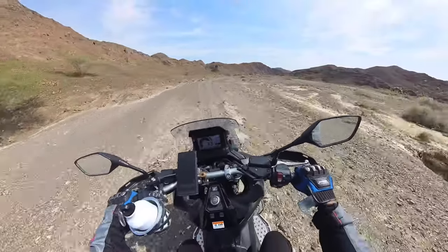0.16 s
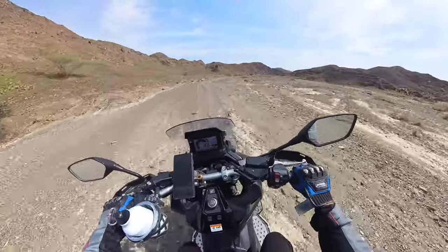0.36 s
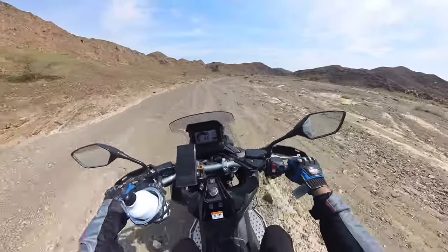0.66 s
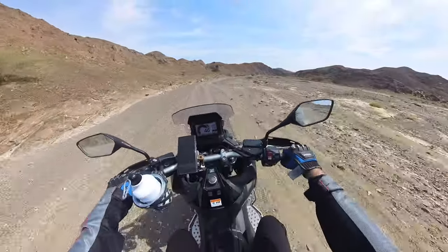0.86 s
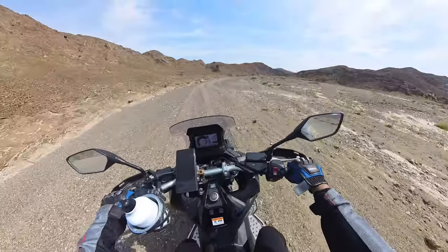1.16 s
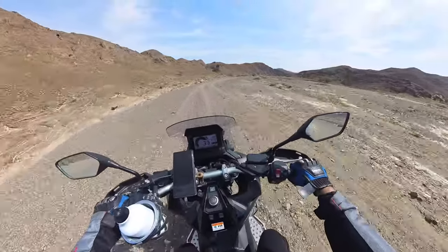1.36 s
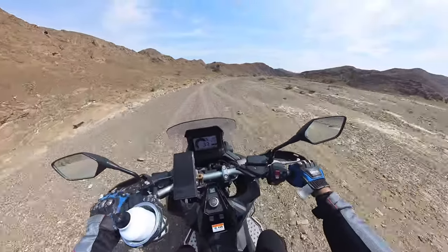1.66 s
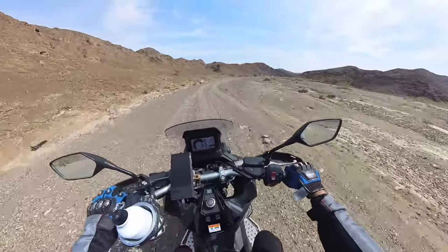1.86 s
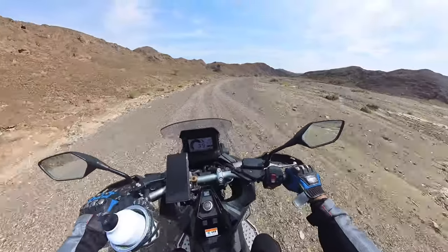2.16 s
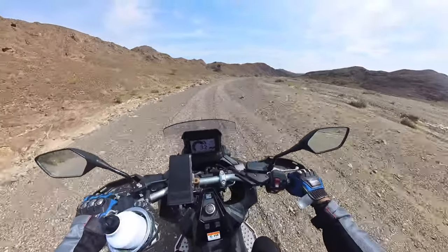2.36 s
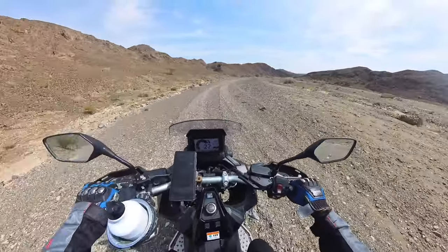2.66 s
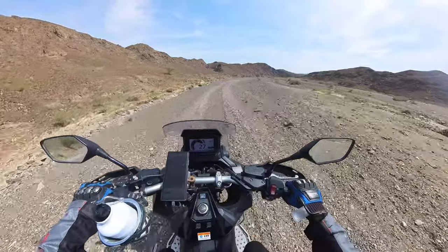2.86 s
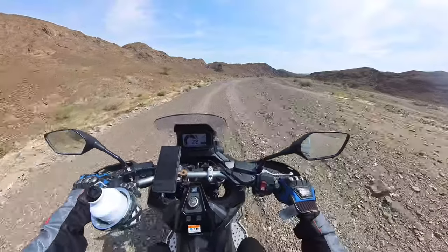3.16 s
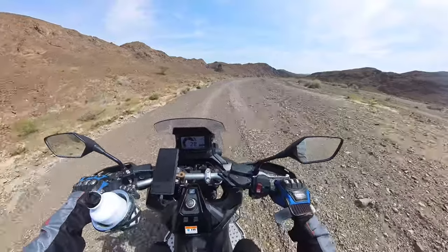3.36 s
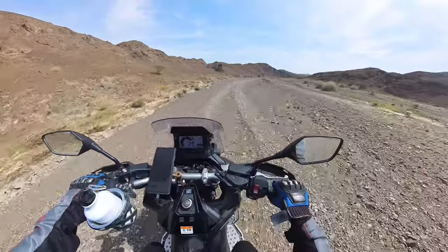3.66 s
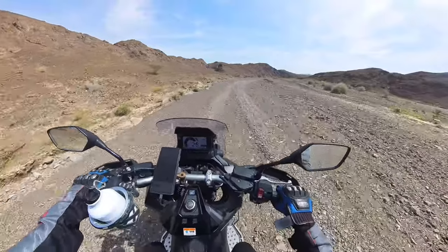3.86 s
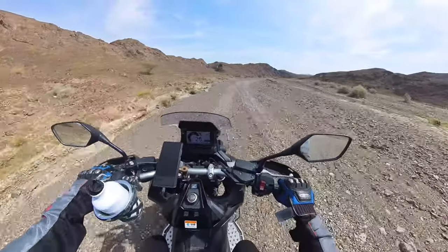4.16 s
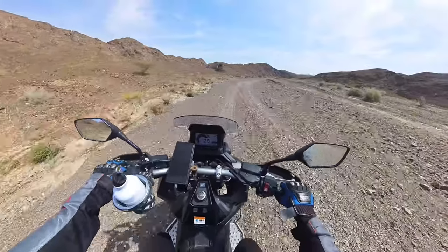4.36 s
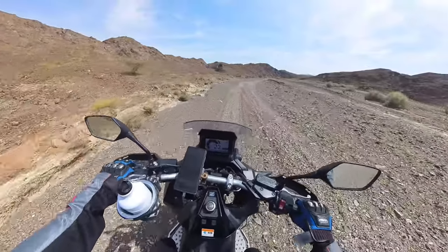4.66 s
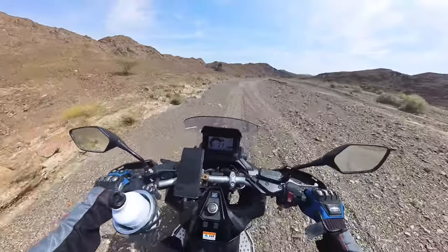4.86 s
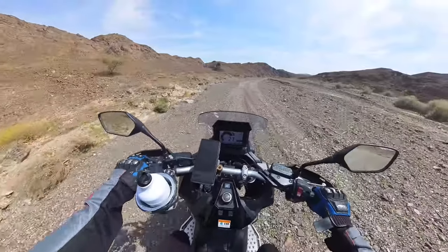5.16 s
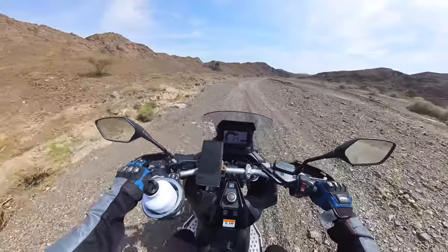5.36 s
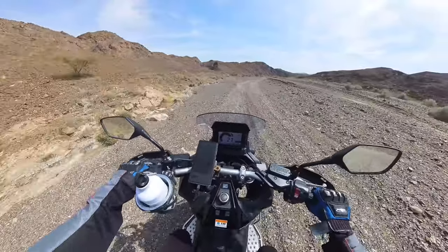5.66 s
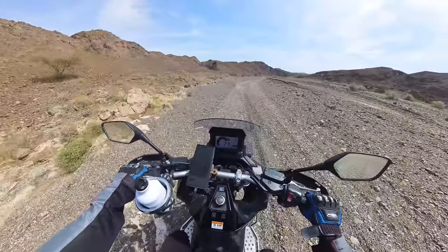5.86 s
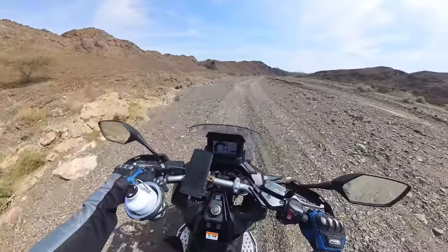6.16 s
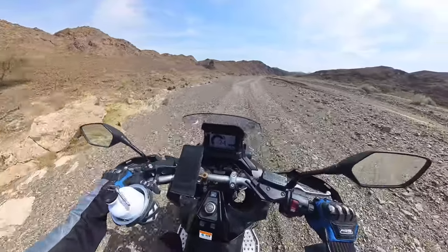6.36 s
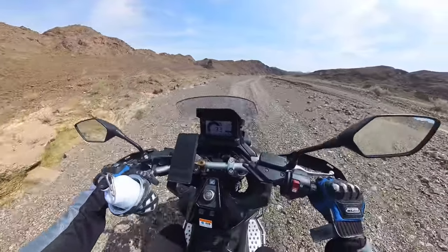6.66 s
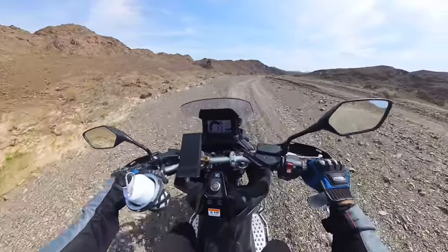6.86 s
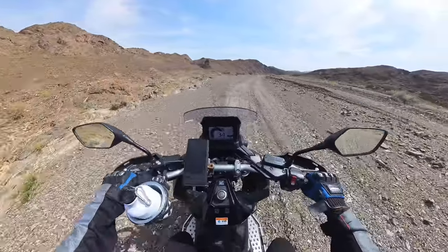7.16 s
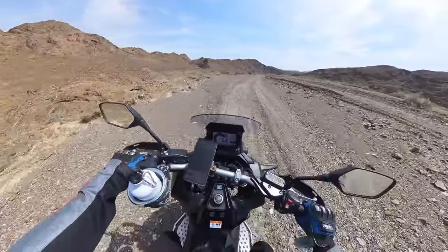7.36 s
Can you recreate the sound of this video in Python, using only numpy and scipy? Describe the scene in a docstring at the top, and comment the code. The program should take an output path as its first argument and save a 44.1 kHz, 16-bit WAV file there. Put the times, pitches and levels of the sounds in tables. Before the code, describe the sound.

A twin-cylinder motorcycle runs along a gravel track, heard close from the rider's chest, with crunching tyres, ticking pebbles and a low wind rumble throughout. A few stones knock on the chassis in the first half second. At about 0.5 seconds the engine flares in a loud, booming rev as the rumble swells, then the throttle snaps shut at 0.9 seconds with a brief ringing note from the pipes. The revs sink gradually, growing quieter and reaching an uneven, near-idle chug by 4.7 seconds. Faint pebble clicks come between 3.8 and 5 seconds. From 5.8 seconds the engine pulls again, rising in pitch with hard, thumping, hissing beats and louder gravel, strongest from 6.5 to 7.1 seconds and slightly overloading the microphone. The throttle then closes, the revs fall, and a stone knocks sharply on the chassis at about 7.3 seconds, followed by a softer knock.

```python
"""A twin-cylinder motorcycle on a gravel track, heard from the rider's chest.
The engine flares, eases down almost to idle and pulls again. Each cylinder gulps air: the gulp
thumps, booms in the airbox, barks in the pipes and hisses. Tyres crunch, pebbles tick and stones
knock on the chassis over a rumble of wind and frame. The loudest beats overload the microphone."""
import sys
import numpy as np
from scipy import signal
from scipy.fft import rfft, irfft, next_fast_len
from scipy.io import wavfile
from scipy.ndimage import uniform_filter1d

SR = 44100
rng = np.random.default_rng(int(sys.argv[2]) if len(sys.argv) > 2 else 0)


def file_out(sig):
    """Save sig as 16-bit WAV at sys.argv[1]."""
    # one column per channel
    cols = np.atleast_2d(sig).T
    # limit, then scale
    lim = np.clip(cols, -1, 1)
    pcm = np.round(lim * 32767).astype(np.int16)
    wavfile.write(sys.argv[1], SR, pcm)


N = 331191
T = np.arange(N) / SR

START_TURN, SECOND_CYLINDER = -.44, 3 / 8  # cycles: starting crank angle, lag of the second cylinder
CRACKED = 0.074  # throttle opening at which the cylinders begin to draw freely
PULLING = (0.22, 0.44)  # openings between which the engine turns from trailing to pulling

# The rise and fall of the airbox boom. Each row: time in seconds, level in dB.
BOOM_LEVEL = [(0, -26), (.38, -28.5), (.47, -20), (.9, -21), (1.1, -32), (1.9, -28), (2.38, -27.5),
              (2.7, -39), (3.1, -35.5), (4.05, -44), (4.3, -35), (4.7, -41), (5.2, -30), (5.5, -34.5),
              (5.8, -25.5), (6.45, -15.5), (7.1, -19), (7.51, -23)]
# The midrange colour of tyre crunch and engine chuff. Each row: frequency in Hz, relative level in dB.
MIDRANGE_SPECTRUM = [(150, 5.5), (300, 9.5), (420, 14), (560, 9), (740, 6.5), (900, 4), (1350, 2),
                     (1550, -4.5), (1950, -14), (2400, -18.5), (2900, -30), (4500, -62.5), (9500, -32.5),
                     (12000, -65)]
# The bright colour of loose pebbles. Each row: frequency in Hz, relative level in dB.
PEBBLE_SPECTRUM = [(800, -5.5), (2000, 7), (3400, -0.5), (4500, -6.5), (6000, -5), (9500, -2.5),
                   (12000, -16.5), (15500, -18)]


def amp(db):
    """Decibels as a gain."""
    return 10 ** (np.asarray(db) / 20)


def bell(x, width):
    """A smooth bump of height 1 around zero."""
    return np.exp(-.5 * (x / width) ** 2)


def swell(at_s, width_s, db):
    """A gain that rises by db around one moment."""
    return amp(db * bell(T - at_s, width_s))


def curve(rows):
    """An envelope of straight lines through (seconds, value) points."""
    return np.interp(T, *np.transpose(rows))


def evened(x):
    """Unit power over the whole sound."""
    return x / np.sqrt(np.mean(x ** 2) + 1e-20)


def steadied(x, size=7000):
    """Unit power over a sliding window of samples; single beats keep their accents."""
    return x / np.sqrt(abs(uniform_filter1d(uniform_filter1d(x ** 2, size), size)) + 1e-12)


def coloured(x, spectrum):
    """Equalises x with a curve of (Hz, dB) points."""
    hz, db = np.transpose(spectrum)
    size = next_fast_len(N + 4096)
    gain = amp(np.interp(np.log(np.fft.rfftfreq(size, 1 / SR) + 1), np.log(hz), db))
    return irfft(rfft(x, size) * gain, size)[:N]


def noise(spectrum):
    """Coloured noise of unit power."""
    return evened(coloured(rng.standard_normal(N), spectrum))


def resonate(x, modes):
    """Rings parallel resonances, each given as (Hz, width in Hz, dB)."""
    return sum(amp(db) * signal.lfilter(*signal.iirpeak(hz, hz / width, SR), x)
               for hz, width, db in modes)


def controls():
    """The drive: engine speed, and the throttle opening with the jolts of the rider's wrist."""
    # The revs. Each row: time in seconds, four-stroke cycles per second.
    revs = [(0, 23.65), (.39, 23.49), (.43, 26.07), (.73, 28.65), (.81, 33.74), (1.05, 25.26),
            (1.93, 22.55), (2.34, 20.07), (2.45, 20.4), (2.71, 16.32), (2.85, 17.99), (3.36, 16.93),
            (3.53, 15.76), (4.39, 15.8), (4.72, 12.77), (5.74, 12.51), (5.8, 14.36), (6.03, 14.73),
            (6.42, 17.8), (6.46, 19.25), (7.11, 22.81), (7.51, 16.6)]
    # The twist grip: a burst, a long trail, idle, a pull. Each row: time in seconds, opening 0-1.
    grip = [(0, .01), (.45, 0), (.58, 0.79), (.86, 0.89), (.92, .03), (1.12, .05), (1.23, 0.06),
            (2.3, 0.21), (3.35, 0.1), (3.9, 0.02), (5.69, 0), (5.79, 0.31), (6.3, 0.53), (6.48, 0.87),
            (7.05, 0.99), (7.27, 0.03), (7.51, 0.1)]
    # Bumps jolt the wrist. Each row: centre in seconds, half length in seconds, change of opening.
    bumps = [(2.438, 0.071, -.14), (2.737, 0.057, 0.15), (2.836, 0.047, -.22), (3.238, 0.025, -.14),
             (3.524, 0.083, 0), (3.799, 0.0083, 0.23), (6.459, .035, .15), (6.6, .05, -.18),
             (7.17, .05, -.12)]
    jolts = sum(change * bell(T - at, half) for at, half, change in bumps)
    return curve(revs), np.clip(curve(grip) + jolts, 0, 1)


def loudness(speed, throttle, db, octave, cracked, full):
    """Gain: db at 20 cycles/s, plus dB per octave of speed, once cracked open and at full throttle."""
    return amp(db + octave * np.log2(speed / 20) + cracked * np.tanh(throttle / CRACKED)
               + full * throttle)


def pull(throttle):
    """How firmly the engine pulls, from 0 (trailing) to 1."""
    return np.interp(throttle, PULLING, (0, 1))


def unevenness(speed, throttle):
    """A slow engine on a shut throttle fires unevenly; speed or throttle firms it up."""
    idle_speed, firm_opening = 11.6, 0.33
    return 0.083 + 0.44 * np.exp(-(speed - idle_speed) / 4.5 - (throttle / firm_opening) ** 2)


def crank_turns(speed):
    """The running crank angle, in four-stroke cycles."""
    return START_TURN + np.cumsum(speed) / SR


def strokes(speed, throttle):
    """For each cylinder: crank angle from its nearest gulp in cycles, its strength, a random accent."""
    turns, rough = crank_turns(speed), unevenness(speed, throttle)
    cylinders = []
    for offset in (0, SECOND_CYLINDER):
        nearest = np.round(turns - offset)
        late, strong, accent = rng.standard_normal((256, 3))[nearest.astype(int) + 2].T
        angle = turns - offset - nearest - 0.046 * rough * late
        cylinders.append((angle, amp(6.4 * rough * strong), accent))
    return cylinders


def gulps(cylinders, width, lag, second_db):
    """Pressure rises, then drops sharply as the valve opens; width and lag are in cycles."""
    return sum(-amp(db) * strength * (angle - lag) / width * bell(angle - lag, width)
               for (angle, strength, _), db in zip(cylinders, (0, second_db)))


def beats(cylinders, throttle, scatter_db=1.8, second_db=-1):
    """Crank angle and scattered gain of each cylinder's beats; the second is softer under load."""
    return [(angle, amp(scatter_db * accent + db * throttle))
            for (angle, _, accent), db in zip(cylinders, (0, second_db))]


def intake_thump(cylinders, speed, throttle):
    """Broad gulps of air thump; under load they are shorter."""
    pulling = pull(throttle)
    pressure = gulps(cylinders, width=.06 - 0.016 * pulling, lag=0.0017 + 0.0085 * pulling, second_db=.1)
    return steadied(pressure) * loudness(speed, throttle, db=-30, octave=9, cracked=9, full=-8)


def airbox_boom(cylinders, throttle):
    """The steep edge of each gulp rings the airbox."""
    # The airbox's one low resonance: frequency in Hz, width in Hz, relative level in dB.
    airbox = [(110.5, 26.4, 0)]
    pressure = gulps(cylinders, width=0.038, lag=0.0078 + 0.011 * pull(throttle), second_db=-1)
    return steadied(resonate(pressure, airbox)) * amp(curve(BOOM_LEVEL))


def pipe_bark(cylinders, speed, throttle):
    """Sharp gulps and pulsing turbulence ring the pipes, raspier when the firing is uneven."""
    # The pipes' resonances. Each row: frequency in Hz, width in Hz, relative level in dB.
    pipes = [(185, 16, -11.5), (250, 30, 6), (274.6, 56, 11), (317.7, 44, 6), (400, 33, -18)]
    clean = steadied(resonate(gulps(cylinders, width=0.0057, lag=0.017, second_db=-2), pipes))
    gate = sum(bell(angle - .05, 0.15) for angle, _, _ in cylinders)
    turbulent = steadied(resonate((0.29 + gate) * rng.standard_normal(N), pipes))
    bark = steadied(clean + (0.35 + 0.96 * unevenness(speed, throttle)) * turbulent)
    follow = amp(.45 * (curve(BOOM_LEVEL) + 26.5))  # a share of the boom's swing about its middle level
    return bark * follow * loudness(speed, throttle, db=-48, octave=7, cracked=2, full=1)


def engine_note(speed, throttle):
    """Clean upper harmonics, locked to the crank; their mix changes with the load."""
    # Each row: multiple of the cycle rate, then relative dB with the throttle shut, trailing, pulling.
    harmonics = [(7, -45, -39, -48), (8, -38, -38, -31), (9, -54, -45, -37), (10, -51, -47, -41),
                 (11, -47, -42, -35), (12, -49, -42, -41), (13, -53, -44, -41), (14, -42, -50, -39),
                 (15, -58, -44, -47), (16, -58, -42, -42), (17, -60, -52, -43), (18, -58, -48, -54),
                 (19, -54, -55, -48), (21, -61, -58, -55)]
    turns = crank_turns(speed) - .2  # 0.2 cycles after each gulp, so the pulses fall between the gulps
    drawing, pulling = np.tanh((throttle / CRACKED) ** 2), pull(throttle)
    brisk = np.interp(speed, (18, 21.5), (.1, 1))  # without load the note fades near idle
    shares = np.array([brisk * (1 - drawing), brisk * drawing * (1 - pulling), pulling])
    tone = np.zeros(N)
    for order, *db in harmonics:
        pair_phase = np.angle(1 + np.exp(-2j * np.pi * order * SECOND_CYLINDER))
        tone += amp(db) @ shares * np.cos(2 * np.pi * order * turns + pair_phase)
    return np.sqrt(2) * tone * loudness(speed, throttle, db=1.5, octave=2.5, cracked=-3, full=0.5)


def pipe_singing(speed, throttle):
    """Turbulence excites one sharp pipe resonance, which sings out as the first burst snaps shut."""
    # The resonance, rung twice over to narrow it: frequency in Hz, width in Hz, relative level in dB.
    mode = [(327, 12, 0)]
    tone = steadied(resonate(resonate(rng.standard_normal(N), mode), mode), size=3000)
    gain = loudness(speed, throttle, db=-50, octave=11, cracked=-12.5, full=10.5)
    return tone * gain * swell(at_s=0.89, width_s=0.06, db=23)


def intake_hiss(cylinders, speed, throttle):
    """Each gulp hisses; under load the hiss tightens to a snap with a weaker one close behind."""
    # The colours of the soft hiss and the hard snap. Each row: frequency in Hz, relative level in dB.
    hiss_spectrum = [(300, -7), (1200, 9), (2000, 5.5), (2700, 2.5), (4000, -7), (5600, -4), (6800, -10),
                     (9500, -6.5), (11500, -20), (15500, -27.5)]
    snap_spectrum = [(200, 0.5), (1200, 17.5), (2400, 7), (4000, -0.5), (7000, -3), (9500, -10.5),
                     (12000, -18), (15500, -18)]
    load = np.clip(throttle, 0, .94)
    lag = .06 - 0.0021 * speed  # cycles; the snap comes earlier at speed
    pulses = beats(cylinders, throttle)
    puff = sum(size * bell(angle + .004 - .04 * load, 0.034 - 0.012 * load) for angle, size in pulses)
    crack = sum(size * (bell(angle - lag, 0.014) + 0.15 * bell(angle - lag - .11, 0.0077))
                for angle, size in pulses)
    hiss = np.sqrt(1 - load) * steadied(puff * noise(hiss_spectrum))
    snap = load * steadied(crack * noise(snap_spectrum))
    drawing = np.tanh((throttle / CRACKED) ** 2)  # no hiss with the throttle shut
    gain = loudness(speed, throttle, db=-59.5, octave=11.5, cracked=0.5, full=9)
    return gain * drawing * (hiss + amp(1.5) * snap)


def chuff(cylinders, speed, throttle):
    """With the throttle open each beat lets out a short, hard puff of midrange noise."""
    lag, rise, fade = 0.023, .008, 0.043  # cycles
    burst = sum(size * np.where(angle < lag, bell(angle - lag, rise), np.exp(-(angle - lag) / fade))
                for angle, size in beats(cylinders, throttle))
    opened = np.interp(throttle, (0, PULLING[1]), (0, 1))
    gain = loudness(speed, throttle, db=-51, octave=1, cracked=3.5, full=3.5)
    return steadied(burst * noise(MIDRANGE_SPECTRUM)) * gain * opened


def tyre_crunch(cylinders, speed, throttle, grains_per_s=500):
    """Tyre and gear noise that throbs under load, with separate grains of gravel."""
    grains = (rng.random(N) < grains_per_s / SR) * rng.standard_normal(N)
    grains *= amp(2.4 * np.minimum(rng.exponential(1, N), 4))
    throb = 1 + (0.49 + 1.4 * throttle) * sum(bell(angle - .03, 0.06) for angle, _, _ in cylinders)
    crunch = evened(throb * noise(MIDRANGE_SPECTRUM)) + .5 * evened(coloured(grains, MIDRANGE_SPECTRUM))
    return crunch * loudness(speed, throttle, db=-49, octave=7, cracked=-1, full=10.5)


def frame_ring():
    """The frame and casings ring faintly and steadily."""
    # Each row: frequency in Hz, width in Hz, relative level in dB.
    modes = [(718.3, 39, 3), (1277, 65, -5), (2415, 85, -27.5)]
    shaking = resonate(rng.standard_normal(N), [(hz, width, 0) for hz, width, _ in modes])
    return amp(-61) * evened(resonate(shaking, modes))


def pebble_ticks(speed, throttle, ticks_per_s=250, decay_s=0.00079):
    """Loose pebbles under the tyres: bright ticks, tiny to large, over a fine sandy fizz."""
    ticks = (rng.random(N) < ticks_per_s / SR) * amp(14 * np.minimum(rng.exponential(1, N), 4))
    scrapes = signal.lfilter([1], [1, -np.exp(-1 / (decay_s * SR))], ticks) * rng.standard_normal(N)
    grit = evened(coloured(scrapes, PEBBLE_SPECTRUM)) + 0.72 * noise(PEBBLE_SPECTRUM)
    return grit * loudness(speed, throttle, db=-77, octave=14.5, cracked=-0.5, full=14.5)


def wind_rumble(speed, throttle):
    """Wind and frame rumble, swelling as the wheels drop through a rut."""
    # The rumble's deep colour. Each row: frequency in Hz, relative level in dB.
    spectrum = [(10, -18.5), (22, 11), (40, -2.5), (75, 5), (115, -5.5), (165, -5.5), (210, -12.5),
                (290, -7), (370, -26.5), (600, -47), (2000, -90.5)]
    gain = loudness(speed, throttle, db=-30.5, octave=4.5, cracked=1, full=5)
    return noise(spectrum) * gain * swell(at_s=0.57, width_s=0.2, db=6.3)


def stone_knocks(scrape_s=0.0016):
    """A thrown stone gives a short scrape that rings the chassis."""
    # The hits. Each row: start in seconds, relative peak level in dB.
    hits = [(0.272, -34), (0.415, -41.5), (0.461, -45), (4.839, -51), (7.27, -28), (7.328, -39)]
    # The chassis ring. Each row: frequency in Hz, relative level in dB, seconds to fall by 60 dB.
    chassis = [(560, 11, 0.047), (730, 15.5, 0.033), (980, 12, 0.027), (1220, 20, 0.046), (1420, 2, .03),
               (1680, -8.5, .02), (2350, -23, .02)]
    t, knocks = np.arange(4000) / SR, np.zeros(N)
    ring = sum(amp(db - 60 * t / t60) * np.sin(2 * np.pi * hz * t) for hz, db, t60 in chassis)
    for start, db in hits:
        scrape = rng.standard_normal(len(t)) * np.exp(-t / scrape_s)
        knock = signal.fftconvolve(ring, scrape)[:len(t)]
        slot = knocks[round(start * SR):][:len(t)]
        slot += amp(db + 2.5) * knock[:len(slot)] / abs(knock).max()
    return knocks


def pebble_flicks(decay_s=0.0031):
    """A pebble flicked against the underside gives one short bright scrape and a clink."""
    # Each row: start in seconds, level in dB, pitch of the clink in Hz.
    flicks = [(3.78, -49, 2100), (4.188, -59, 7000), (4.782, -59, 3060), (4.836, -58, 6400),
              (5.046, -53, 2380)]
    scrape, clicks = 0.46 * noise(PEBBLE_SPECTRUM), np.zeros(N)
    for start, db, hz in flicks:
        envelope = (T >= start) * np.exp(-abs(T - start) / decay_s)
        clink = .5 * np.sin(2 * np.pi * hz * (T - start))
        clicks += amp(db) * envelope * (scrape + clink)
    return clicks


def scene():
    """Engine, track and wind in mono; speed and throttle drive the running layers."""
    drive = speed, throttle = controls()
    cylinders = strokes(*drive)
    motor = intake_thump(cylinders, *drive) + airbox_boom(cylinders, throttle)
    motor += pipe_bark(cylinders, *drive) + engine_note(*drive) + pipe_singing(*drive)
    motor += intake_hiss(cylinders, *drive) + chuff(cylinders, *drive)
    track = tyre_crunch(cylinders, *drive) + frame_ring()
    track += pebble_ticks(*drive) + pebble_flicks() + stone_knocks()
    return (motor + track + wind_rumble(*drive))[None]


def record(dry):
    """The microphone rounds off the loudest beats; then the highest treble is cut."""
    ceiling, knee, cutoff_hz = .246, 4, 15850
    limited = dry / (1 + abs(dry / ceiling) ** knee) ** (1 / knee)
    lowpass = signal.firwin(511, cutoff_hz, window=("kaiser", 9), fs=SR)
    return signal.oaconvolve(limited, lowpass[None], "same")


dry = scene()
out = record(dry)
file_out(out)
```